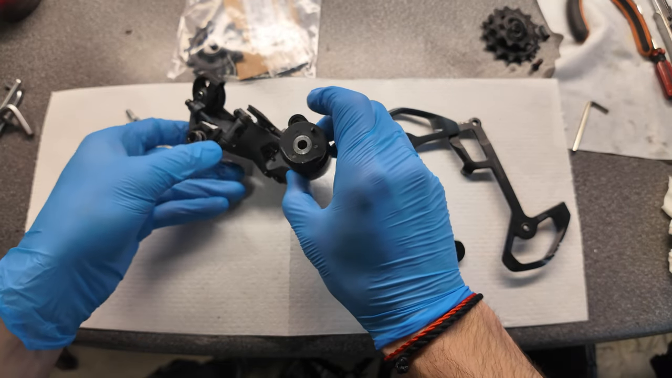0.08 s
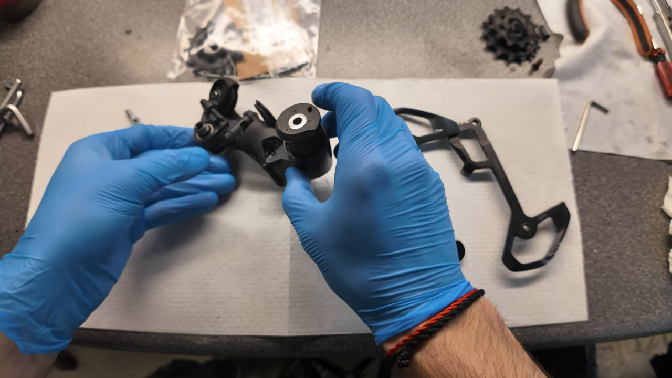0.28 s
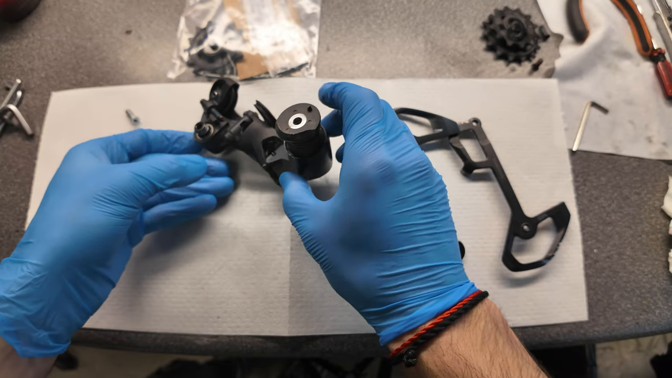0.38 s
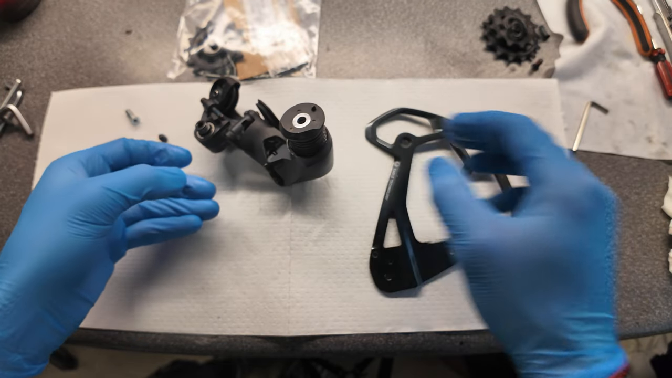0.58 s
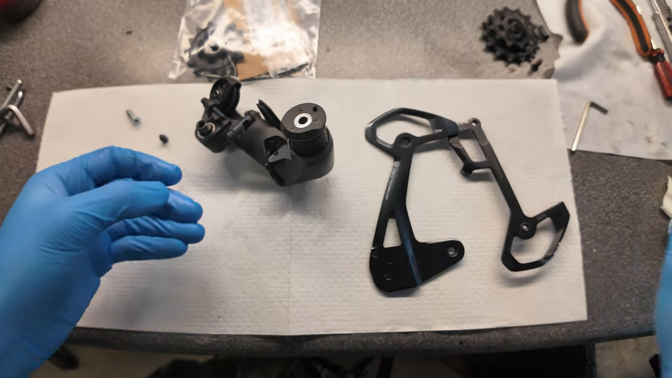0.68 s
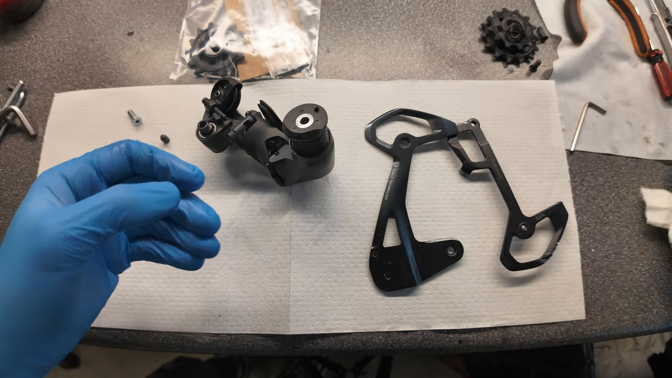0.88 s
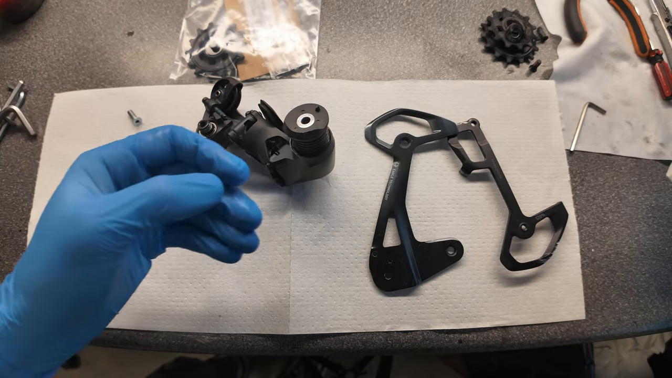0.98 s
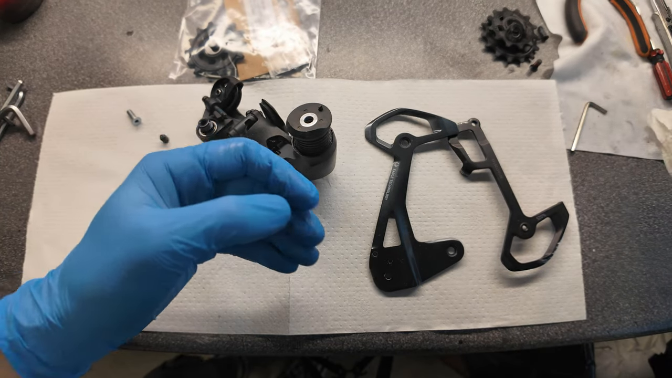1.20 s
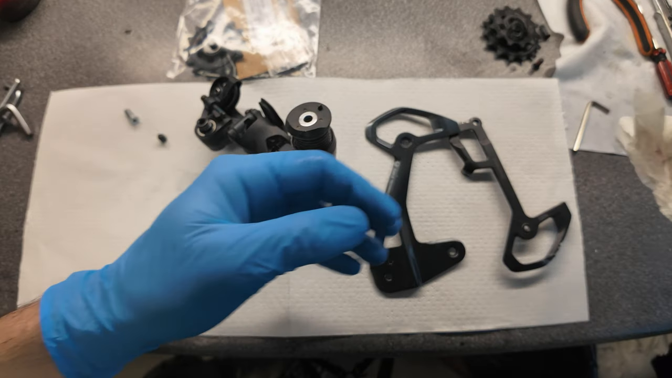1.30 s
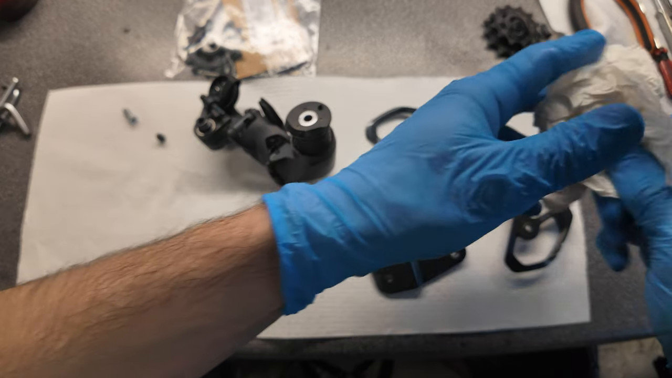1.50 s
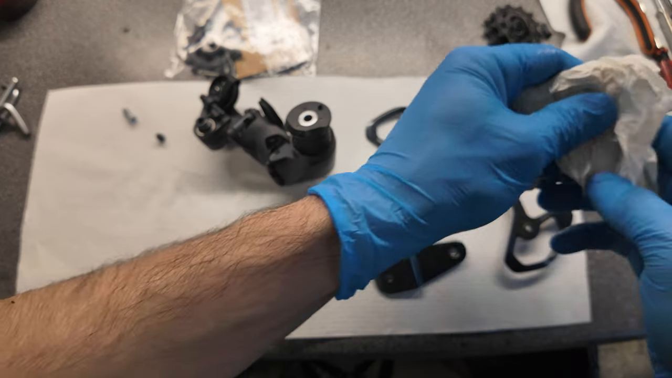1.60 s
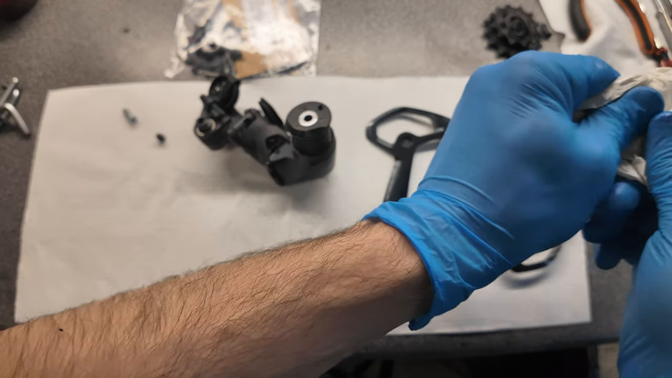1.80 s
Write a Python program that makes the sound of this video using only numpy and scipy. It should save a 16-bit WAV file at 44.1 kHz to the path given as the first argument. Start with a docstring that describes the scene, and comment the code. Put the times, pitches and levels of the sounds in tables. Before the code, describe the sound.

A metal part knocks twice on a wooden bench, bouncing with small rattling ticks; after a quieter pause a paper rag is crumpled in growing strokes at the right, close stereo microphones, low workshop machine hum.

```python
"""Two dull knocks with bounces come first: a gloved hand sets a metal part on a wooden bench, loose bits ticking.
Then the hands pick up a paper rag, at the right microphone, and crumple it in strokes.
A machine hums and throbs nearby in the workshop, over low rumble and microphone hiss.
Knocks ring the modes of the board, ticks are noise bursts through the modes of the metal,
paper is filtered grains, short tones and snaps, and the machine is a row of throbbing harmonics."""
import sys
import numpy as np
from scipy import signal
from scipy.fft import rfft, irfft, next_fast_len
from scipy.io import wavfile
from scipy.ndimage import uniform_filter1d, map_coordinates

SR = 44100
rng = np.random.default_rng(int(sys.argv[2]) if len(sys.argv) > 2 else 0)


def wav_out(sig):
    """Save sig, one row per channel (or a flat mono array), as 16-bit PCM at SR to the path in sys.argv[1]."""
    wavfile.write(sys.argv[1], SR, np.round(np.clip(np.atleast_2d(sig).T, -1, 1) * 32767).astype(np.int16))


N = 79380
T = np.arange(N) / SR


def amp(db):
    """Decibels to amplitude."""
    return 10 ** (np.asarray(db) / 20)


def unit(x):
    """Scale to an RMS of one."""
    return x / np.sqrt(np.mean(x ** 2) + 1e-20)


def along(points, hz):
    """Read (frequency [Hz], value) points on a log frequency axis."""
    f, value = np.transpose(points)
    return np.interp(np.log(hz + 1), np.log(f + 1), value)


def curves(rows):
    """One value per sample for each column after the time; flat beyond the ends."""
    s, *cols = np.transpose(rows)
    return [np.interp(T, s, c) for c in cols]


def wobble(rate):
    """A smooth random curve with `rate` knots a second."""
    knots = rng.standard_normal(int(N * rate / SR) + 4)
    return map_coordinates(knots, [T * rate])


def filtered(x, response):
    """Multiply the spectrum of x by a (complex) response of frequency."""
    m = next_fast_len(N + 8192)
    return irfft(rfft(x, m) * response(np.fft.rfftfreq(m, 1 / SR)), m)[..., :N]


def spread(pair, alike):
    """Mix two signals as mid and side; unrelated ones get the given left-right likeness."""
    turn = lambda hz: np.arccos(np.clip(along(alike, hz), -1, 1)) / 2
    mid, side = filtered(pair, lambda hz: np.array([np.cos(turn(hz)), np.sin(turn(hz))]))
    return np.array([mid + side, mid - side])


def patchy(patchy_db):
    """Two noises sharing patches of random gain in time and frequency."""
    z = signal.stft(rng.standard_normal((2, N)), nperseg=256)[2]
    field = uniform_filter1d(rng.standard_normal(z.shape[1:]), size=4, axis=0)
    field = uniform_filter1d(field, size=8, axis=1)
    noise = signal.istft(z * amp(patchy_db * unit(field)), nperseg=256)[1]
    return unit(noise[:, :N])


def crackle(per_s, scatter_db):
    """Two trains of tiny clicks at shared moments, with a few much larger than the rest."""
    when = rng.random(N) < per_s / SR
    size = when * amp(scatter_db * np.minimum(rng.exponential(size=N), 3))
    burst = signal.lfilter([1], [1, -.8], size)
    return unit(burst * rng.standard_normal((2, N)))


def clicks(rows, t60, spread_oct, crack_db):
    """Short rings: three partials, one on the pitch and two scattered, with a burst of noise."""
    out, t = np.zeros(N + SR), np.arange(SR // 10) / SR
    for s, db, hz in rows:
        partials = hz * 2 ** (spread_oct * rng.standard_normal((3, 1)) * [[0], [1], [2]])
        ring = np.sin(2 * np.pi * np.minimum(partials, SR / 3) * t).sum(0) / 2
        ring = ring + amp(crack_db) * rng.standard_normal(len(t))
        rise = 1 - np.exp(-t / 0.00039)
        out[round(s * SR):][:len(t)] += amp(db - 60 * t / t60) * ring * rise
    return out[:N]


def dying(table, pair):
    """Noise whose every band has its own level and decay."""
    hz, t, z = signal.stft(pair, SR, nperseg=256)
    f, db, t60 = np.transpose(table)
    shape = along(np.c_[f, db], hz)[:, None] - 60 * t / along(np.c_[f, t60], hz)[:, None]
    return signal.istft(z * amp(shape), SR, nperseg=256)[1][..., :pair.shape[-1]]


# Colour of the workshop rumble and microphone hiss: (frequency [Hz], relative density [dB per Hz])
AIR_COLOUR = [(18, -58), (30, -68), (49, -12), (112, -8.5), (174, -5), (245, -23), (345, -20.5),
              (600, -29.5), (702, -26), (1720, -33), (2010, -36.5), (2290, -35.5), (16000, -47.5)]
# How alike the air is at the two microphones: (frequency [Hz], left-right likeness [-1 to 1])
AIR_LIKENESS = [(60, 0.95), (180, 0.91), (550, 0.31), (1650, 0.48), (4970, -0.5), (15000, -0.68)]
AIR_DB = -63.5


def air():
    """Workshop rumble and microphone hiss: steady coloured noise, partly shared by left and right."""
    noise = filtered(patchy(patchy_db=1.36), lambda hz: amp(along(AIR_COLOUR, hz)))
    return amp(AIR_DB) * unit(spread(noise, AIR_LIKENESS))


# Harmonics of the nearby motor: (multiple of HUM_HZ, relative level [dB], throb depth [0-1])
HUM_HARMONICS = [(1, -85, 0), (2, -67, 0.05), (3, -65, 0.92), (5, -82.5, 0.4)]
HUM_HZ, HUM_GAIN_DB = 55.33, 4.0
THROB_HZ, THROB_PEAK_S = 11.7, .555
UNEVEN = 0.15  # every second throb is stronger


def machine():
    """Harmonics of a motor, swelling with a slower cycle and each drifting in level."""
    turn = 2 * np.pi * THROB_HZ * (T - THROB_PEAK_S)
    throb = np.cos(turn) + UNEVEN * np.cos(turn / 2 + np.pi)
    hum = np.zeros(N)
    for k, db, depth in HUM_HARMONICS:
        level = amp(db + HUM_GAIN_DB + 2.87 * wobble(8.77))
        tone = np.sin(2 * np.pi * (round(k) * HUM_HZ * T + rng.random()))
        hum += level * (1 + depth * throb) * tone
    return hum


# How long the workshop answers: (frequency [Hz], decay by 60 dB [s])
SHOP_DECAY = [(100, 0.78), (500, 0.28), (2000, 0.59), (10000, 0.14)]
# How alike the answer is at the two microphones: (frequency [Hz], left-right likeness [-1 to 1])
SHOP_LIKENESS = [(100, 1), (500, 0.89), (2000, .4), (8000, 0.76)]
SHOP_DB = -22.5


def shop(x):
    """The room's answer, 300 samples late; each frequency dies at its own speed."""
    noise = spread(rng.standard_normal((2, N)), SHOP_LIKENESS)[:, :SR // 2]
    hz, t, z = signal.stft(noise, SR, nperseg=512)
    decay = amp(-60 * t / along(SHOP_DECAY, hz)[:, None])
    tail = signal.istft(z * decay, SR, nperseg=512)[1]
    late = np.pad(x, (300, 0))[None]
    return signal.fftconvolve(late, tail / np.linalg.norm(tail[0]), axes=1)[:, :N]


# Latex creeping as the fingers hold and let go: (time [s], level [dB])
GLOVE_CREEP = [(0, -62), (.03, -71.5), (.13, -72), (.15, -78), (.214, -66.5), (.26, -61.5), (.285, -57),
               (.31, -71), (.35, -77), (.586, -75.5), (.688, -69.5), (.718, -75.5), (.804, -66.5),
               (.86, -71)]
# Colour of the latex: (frequency [Hz], relative density [dB per Hz])
LATEX_COLOUR = [(880, -34), (1500, -8), (2160, -14.5), (5120, -10), (8830, -14.5), (12100, -9.5),
                (16000, -13.5)]


def glove():
    """Faint dry creep of latex: noise and tiny clicks above 1200 Hz, a little stronger at the right."""
    level_db, = curves(GLOVE_CREEP)
    grit = patchy(patchy_db=1.5) + amp(-4) * crackle(per_s=900, scatter_db=5)
    grit = unit(filtered(grit, lambda hz: amp(along(LATEX_COLOUR, hz)) * (hz > 1200)))
    balance = amp([[-1], [1]])  # dB, left and right
    return amp(level_db) * (T < GLOVE_CREEP[-1][0]) * grit * balance


NEAR_DB, NEAR_T60 = -5, 0.05  # dB, s


def nearby(pair):
    """A dense, short cluster of echoes off the bench top and tools, partly its own at each microphone."""
    t = np.arange(SR // 8) / SR
    tail = amp(-60 * t / NEAR_T60) * rng.standard_normal((2, len(t))) * (t > .001)
    tail = amp(NEAR_DB) * (tail[0] + 0.7 * tail) / np.linalg.norm(tail[0]) / 1.53
    return pair + signal.fftconvolve(pair, tail, axes=1)[:, :N]


PLUCKS_PER_S = 540  # before those under 1200 Hz are dropped
PLUCK_HZ, PLUCK_OCT = 1900, 0.9  # middle pitch and its scatter in octaves
PLUCK_CYCLES, PLUCK_SCATTER_DB = 18, 3


def plucks():
    """Taut patches of paper ringing briefly: many damped tones scattered in time and pitch."""
    rows, t = rng.random((2000, 2)), np.arange(700) / SR
    hz = PLUCK_HZ * 2 ** (PLUCK_OCT * rng.standard_normal((2000, 1)))
    kept = (hz > 1200) * (rows[:, 1:] < PLUCKS_PER_S * N / SR / 2000)
    size = amp(PLUCK_SCATTER_DB * rng.standard_normal((2000, 1))) * kept
    fade = np.exp(-t * hz * 3 / PLUCK_CYCLES)
    tone = size * fade * np.sin(2 * np.pi * np.minimum(hz, SR / 3) * t)
    at = (rows[:, :1] * N).astype(int) + np.arange(700)
    return unit(np.bincount(at.ravel(), tone.ravel())[:N])


# Strokes of the rag: (time [s], relative rubbing level [dB], treble tilt [dB], low body tilt [dB])
RAG_STROKES = [(0.862, -82, -1, -4), (0.885, -61, 1.5, -9.5), (0.922, -51.5, -2.5, -9),
               (0.968, -52.5, -4, -17), (0.99, -62.5, 0.5, -8), (1.03, -72, 5.5, -11),
               (1.052, -74.5, 9.5, 0), (1.098, -73, 7, -14), (1.136, -65.5, 3, -3), (1.196, -60.5, 0, -11),
               (1.3, -51.5, -3, -11), (1.362, -61, -3, -9.5), (1.442, -57.5, 2.5, -21),
               (1.512, -54, -3, -7.5), (1.524, -61.5, 1, -16), (1.57, -56.5, -1, -13.5),
               (1.614, -45, 0, -11.5), (1.642, -44, 0.5, -4.5), (1.718, -48, -5.5, -15.5),
               (1.746, -51, -2.5, -7), (1.754, -46, -10, -9.5), (1.786, -46, -5.5, -13.5),
               (1.8, -47, -4, -8)]
# Colour of the paper: (frequency [Hz], relative density [dB per Hz])
PAPER_COLOUR = [(200, -18.5), (350, -7.5), (520, -11.5), (700, -2), (880, 0), (1150, -6.5), (1500, 0),
                (1900, 2), (2600, 2), (3400, 1.5), (5200, 2), (7500, -2), (10500, 1), (13800, -1.5),
                (16000, -4.5)]
# Creases snapping: (time [s], relative level [dB], pitch [Hz])
CREASE_SNAPS = [(0.9953, -41.5, 5530), (1.044, -48, 2760), (1.0645, -47.5, 6150), (1.128, -41, 2700),
                (1.1444, -42.5, 4380), (1.283, -54, 1680), (1.291, -44, 3780), (1.367, -53, 1690),
                (1.5056, -46, 8600), (1.5658, -36.5, 3470), (1.6188, -39.5, 1930), (1.6285, -29.5, 2400),
                (1.643, -41, 1450), (1.6484, -29, 2930), (1.6637, -33, 1970), (1.68, -31, 3460),
                (1.6927, -28, 1870), (1.752, -40, 1510)]
# How alike the rubbing is before it is placed: (frequency [Hz], left-right likeness [-1 to 1])
RAG_LIKENESS = [(300, 1), (1000, 0.87), (3600, 0.42), (6000, 0.99), (9000, 0.066), (16000, 0.089)]
# How far the left microphone lags the right: (frequency [Hz], phase lag [radians])
RAG_LEFT_LAG = [(200, -0.5), (350, 0.9), (700, 1.1), (1050, 3), (1400, 1.42), (2100, 1.5), (3600, 3),
                (5200, 4.5), (8600, 5), (16000, 11.5)]
# The left microphone against the right: (frequency [Hz], left over right [dB])
RAG_LEFT_LEVEL = [(60, -21), (150, 8), (380, -0.5), (950, -2), (2380, -4), (5980, -5.5), (15000, -10)]
GRAINS_PER_S, GRAIN_DB, GRAIN_SCATTER_DB = 1500, -6.5, 6
RUB_GAIN_DB, PLUCK_GAIN_DB = 1.5, 4.0 - 8.5


def rag():
    """Dense fibre grains, ringing patches and crease snaps, mostly earlier and brighter at the right."""
    rub_db, treble_db, low_db = curves(RAG_STROKES)
    started = T > RAG_STROKES[0][0]
    colour = lambda hz: amp(along(PAPER_COLOUR, hz))
    grit = patchy(patchy_db=2.5) + amp(GRAIN_DB) * crackle(GRAINS_PER_S, GRAIN_SCATTER_DB)
    # Three bands, so that each stroke can tilt its own treble and low body.
    high = lambda hz: 1 / (1 + (5000 / (hz + 1)) ** 4)
    low = lambda hz: 1 / (1 + (hz / 1200) ** 4)
    paper = lambda band: filtered(grit, lambda hz: colour(hz) * band(hz))
    body = paper(lambda hz: 1 - high(hz) - low(hz))
    tilt = lambda db: amp(db - np.mean(db[started]))
    rub = body + tilt(treble_db) * paper(high) + tilt(low_db) * paper(low)
    rub = rub / np.std(body) * amp(rub_db + RUB_GAIN_DB + 1.06 * wobble(44.81)) * started
    rub = rub + amp(rub_db + PLUCK_GAIN_DB) * started * unit(filtered(plucks(), colour))
    snaps = filtered(clicks(CREASE_SNAPS, t60=0.012, spread_oct=0.412, crack_db=-1.5), colour)
    pair = nearby(spread(rub * [[1], [.8]], RAG_LIKENESS) + snaps)

    def microphones(hz):
        left = amp(along(RAG_LEFT_LEVEL, hz)) * np.exp(-1j * along(RAG_LEFT_LAG, hz))
        return np.array([left, 1 + 0 * hz])
    return filtered(pair, microphones)


# Modes of the metal part: (frequency [Hz], width [Hz], relative level [dB])
PART_MODES = [(1570, 540, 7), (2280, 770, 4), (3270, 380, 2), (4090, 720, 3.5), (5020, 490, 0.5),
              (6300, 690, -1.5), (7390, 320, 4), (8820, 700, 5), (12500, 4000, -21)]
# Loose metal ticking: (time [s], peak [dB], tilt [dB per octave from 5 kHz]);
# tilt over 0 is brighter, under 0 narrower
METAL_TICKS = [(0.053, -50.5, -21), (0.2464, -59, -23), (0.2627, -37.5, -3), (0.2651, -34, -2),
               (0.272, -37, 6), (0.2802, -45, 6), (0.2858, -39.5, 1), (0.3297, -56, 1.5),
               (0.514, -67.5, -10.5), (0.821, -58, -29)]
TICK_T60, TICK_RISE_S = .013, .0004  # s


def ticks():
    """Loose pieces rattle on the part: short bursts through its modes, mixed anew each time."""
    out, t = np.zeros(N + SR), np.arange(4096) / SR
    f = np.fft.rfftfreq(len(t), 1 / SR)
    lean = lambda db, octaves: db * (octaves if db > 0 else abs(octaves))
    for s, db, tilt_db in METAL_TICKS:
        burst = amp(-60 * t / TICK_T60) * (1 - np.exp(-t / TICK_RISE_S)) * rng.standard_normal(len(t))
        modes = 0
        for k, (hz, width, level) in enumerate(PART_MODES):
            mode_db = level + lean(tilt_db, np.log2(hz / 5000)) + rng.normal(0, 0.6)
            resonance = 1j * f * width / (hz * hz - f * f + 1j * f * width)
            modes = modes + (-1) ** k * amp(mode_db) * resonance  # neighbours in opposite polarity
        ring = irfft(rfft(burst) * modes)
        out[round(s * SR):][:len(t)] += amp(db) * ring / np.abs(ring).max()
    return out[:N]


# Knocks and bounces on the bench: (time [s], relative strength [dB], contact [ms])
BENCH_BLOWS = [(0.0232, -23.5, 1.47), (0.0392, -28.5, 2.43), (0.0471, -35, 3), (0.057, -43, 2.1),
               (0.2359, -18, 1.32), (0.251, -21.5, 2.44), (0.2625, -9.5, 0.98), (0.2715, -23.5, 0.73),
               (0.2801, -17, 1.49), (0.2837, -31, 1.23)]
# Modes of the board: (frequency [Hz], relative level [dB], decay by 60 dB [s])
BENCH_MODES = [(83.7, -25, 0.87), (112.5, -4, 0.12), (146.5, 5.5, 0.07), (189, -4, 0.17), (227, -23, 0.36),
               (262.6, -16, 0.18), (307.6, -4.5, 0.12), (342.4, -10.5, 0.115), (395.4, 3, 0.044),
               (443.4, 6.5, 0.029), (541, -23.5, 0.29), (645, -24, 0.22), (766, -7.5, 0.038),
               (932, -2.5, 0.05), (1217, -27, .42), (1420, -1, 0.05), (1555, 9, 0.018)]
# Dense small modes of the board: (frequency [Hz], relative level [dB], decay by 60 dB [s])
BOARD_RUMBLE = [(60, -27, 0.1), (119, 0, 0.54), (274, 9, 0.19), (560, 6.5, 0.16), (970, 2, 0.12),
                (1290, 9.5, 0.11), (2020, 14.5, 0.069), (3120, 30, 0.11)]
# Body leaning on the bench: (time [s], nominal peak [dB])
BODY_BUMPS = [(0.45, -54), (1.4, -50), (1.579, -64), (1.7316, -42.5)]
MODE_LAG = .7  # radians
SWELL_S = .0025  # the board takes a moment to ring
RUMBLE_DB, RUMBLE_RISE_S = 3, .006
BUMP_HZ, BUMP_T60 = 78.7, 0.058


def knocks():
    """Each soft push on the board rings its modes and a dense rumble; short contact is brighter."""
    out, t = np.zeros(N + SR), np.arange(SR // 2) / SR
    for s, db, ms in BENCH_BLOWS:
        ring = np.zeros(len(t))
        for hz, level, t60 in BENCH_MODES:
            fade = amp(level + rng.normal(0, 1) - 60 * t / t60)
            ring += fade * np.cos(2 * np.pi * hz * t - MODE_LAG)
        ring *= 1 - 0.75 * np.exp(-t / SWELL_S)
        rumble = dying(BOARD_RUMBLE, rng.standard_normal(len(t)))
        ring += amp(RUMBLE_DB) * rumble * (1 - np.exp(-t / RUMBLE_RISE_S))
        push = np.exp(-(t[:400] * 1000 / ms * 3 - 2) ** 2)
        knock = signal.fftconvolve(ring, push / push.sum())[:len(t)]
        out[round(s * SR):][:len(t)] -= amp(db - 9) * knock
    for s, db in BODY_BUMPS:
        fade = amp(db + 7 - 60 * t / BUMP_T60) * (1 - np.exp(-t / 0.002))
        out[round(s * SR):][:len(t)] -= fade * np.sin(2 * np.pi * BUMP_HZ * t)
    return filtered(out[:N], lambda hz: hz ** 4 / (hz ** 4 + 66 ** 4))  # thin out below 66 Hz


# How far the knocks lead at the right microphone: (frequency [Hz], phase lead [radians])
KNOCK_RIGHT_LEAD = [(100, 0), (300, 0.27), (600, 0.43), (1900, 1)]


def bench_at_microphones(wood):
    """The board at the two microphones: nearly equal levels, the right ahead in phase."""
    balance = amp([[.3], [-.3]])  # dB, left and right
    lead = lambda hz: np.outer([-1, 1], along(KNOCK_RIGHT_LEAD, hz))
    return filtered(wood, lambda hz: balance * np.exp(.5j * lead(hz)))


def scene():
    """Bench and metal up close with the room's answer, then glove, rag, machine and air."""
    wood, metal = knocks(), ticks()
    metal_pair = np.array([metal, np.roll(metal, 1)])  # one sample later at the right
    near = bench_at_microphones(wood) + metal_pair
    return near + amp(SHOP_DB) * shop(wood + metal) + glove() + rag() + machine() + air()


def record(dry):
    """The recorder keeps nothing from its band limit upward."""
    top_hz = 15870
    return filtered(dry, lambda hz: hz < top_hz)


dry = scene()
out = record(dry)
wav_out(out)
```